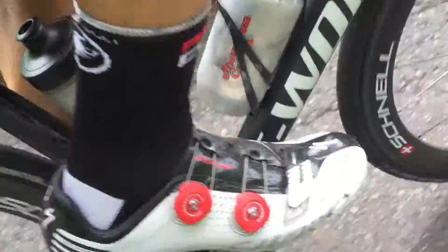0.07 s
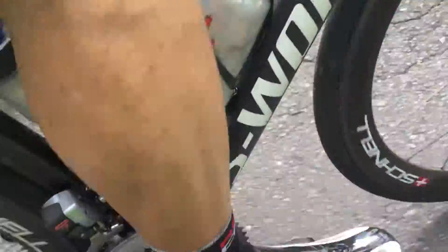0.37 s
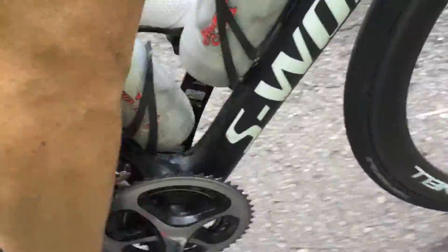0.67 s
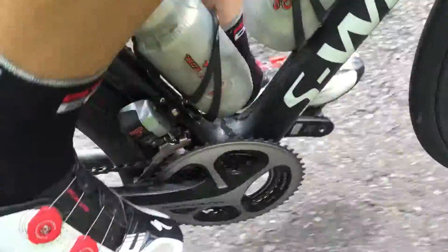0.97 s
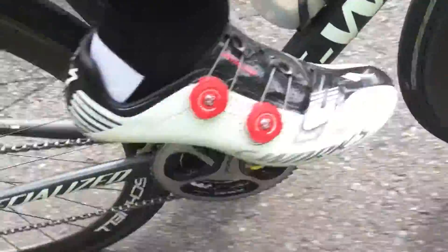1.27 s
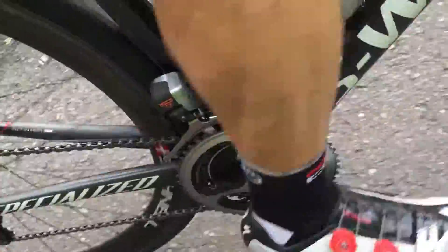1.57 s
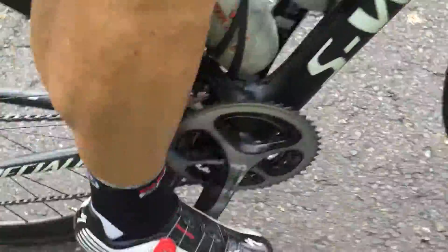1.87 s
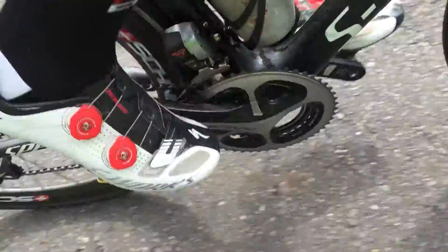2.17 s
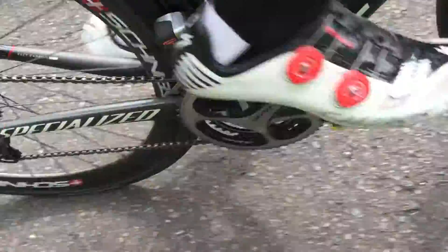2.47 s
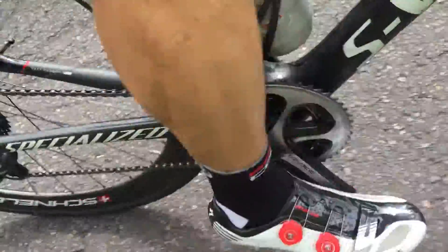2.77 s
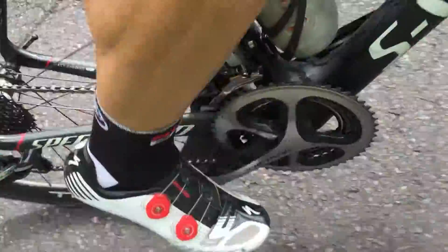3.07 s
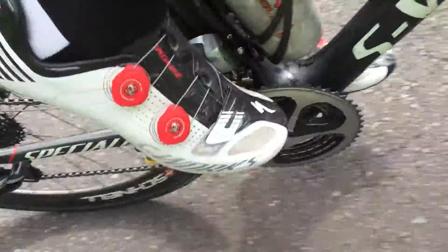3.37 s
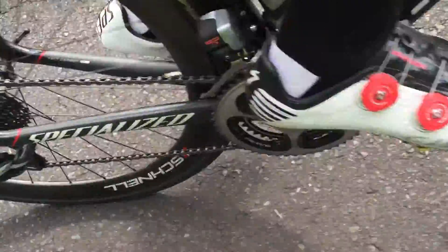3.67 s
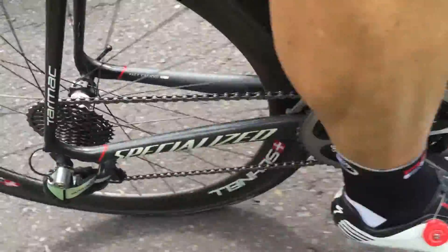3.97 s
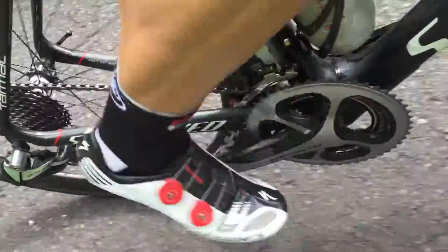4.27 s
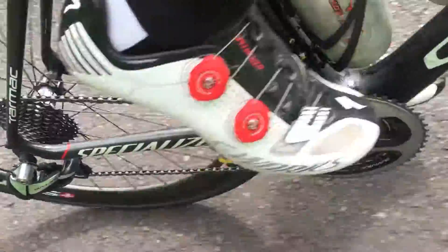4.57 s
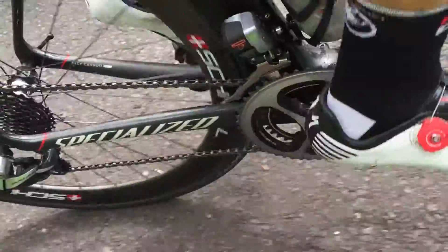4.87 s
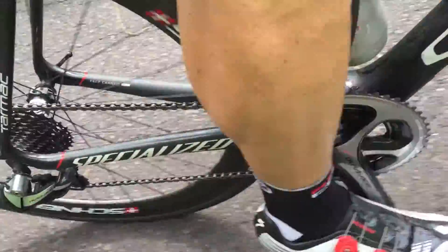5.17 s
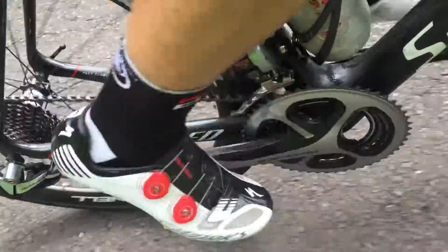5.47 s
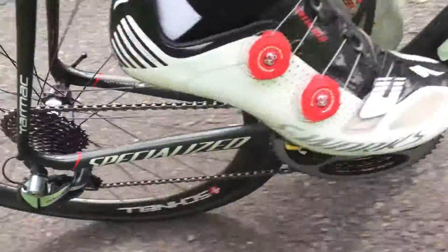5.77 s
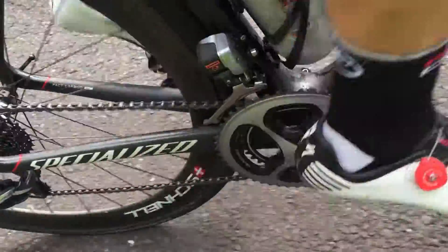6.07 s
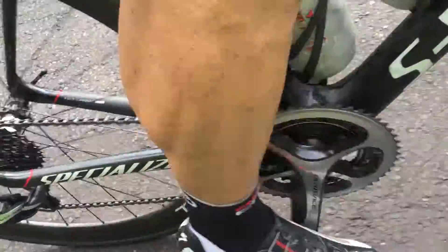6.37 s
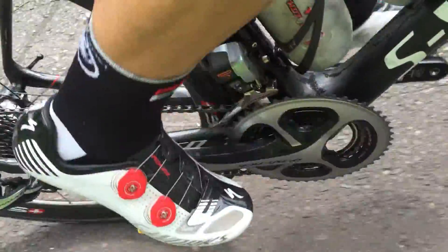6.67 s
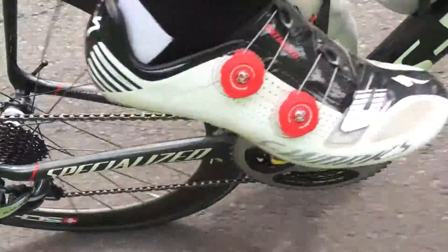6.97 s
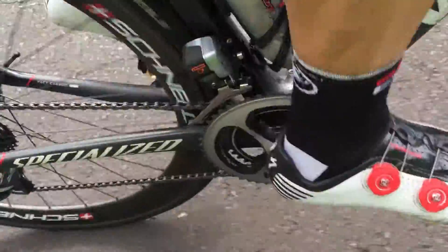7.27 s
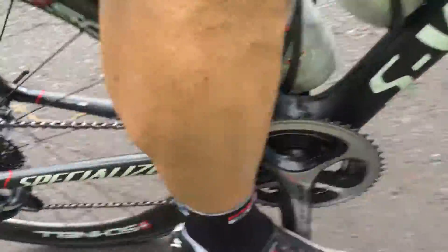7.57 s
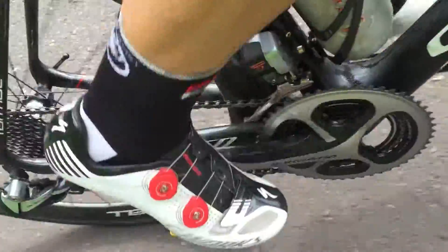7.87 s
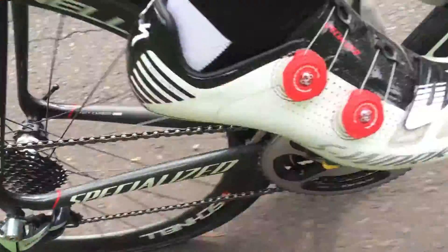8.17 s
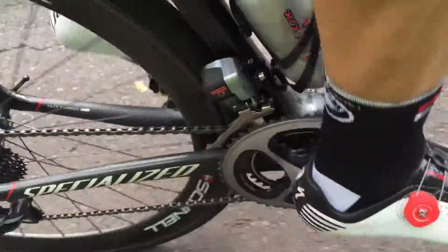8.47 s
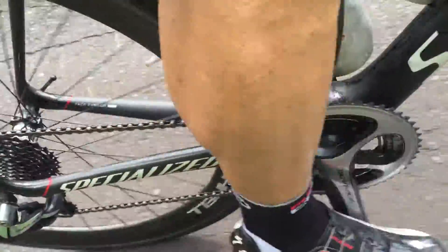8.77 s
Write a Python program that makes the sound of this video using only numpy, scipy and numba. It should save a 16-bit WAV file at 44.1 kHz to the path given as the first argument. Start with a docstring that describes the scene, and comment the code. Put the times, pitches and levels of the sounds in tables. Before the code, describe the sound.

A pedalled bicycle cracks and clunks sharply at uneven intervals, with faint chain ticks and a high insect hiss behind.

```python
"""On an asphalt road with cicadas in the trees, close beside the crank of a pedalled road bicycle.
The freehub slips under load: a heavy clunk, then a bright crack as the pawls catch again; frame and
spokes ring on. Underneath, the chain rustles and ticks, tyres roll and wind buffets the microphone.
A faint whistle sounds near the end. A limiter ducks everything after each loud blow."""
import sys
import numpy as np
from scipy import signal
from scipy.fft import rfft, irfft, next_fast_len
from scipy.io import wavfile
from numba import njit

SR = 44100
rng = np.random.default_rng(int(sys.argv[2]) if len(sys.argv) > 2 else 0)


def write(x):
    x = np.atleast_2d(x).T
    wavfile.write(sys.argv[1], SR, np.round(np.clip(x, -1, 1) * 32767).astype(np.int16))


N = 393813
TIME = np.arange(N) / SR


def undb(db):
    """Decibels to gain."""
    return 10 ** (np.asarray(db) / 20)


def unit(x):
    """Scale to rms 1."""
    return x / np.sqrt(np.mean(x ** 2))


def curve(rows):
    """Rows of (s, value) joined by straight lines."""
    return np.interp(TIME, *np.transpose(rows))


def at(hz, rows, column=1):
    """Read a table column on a log-frequency axis."""
    rows = np.array(rows)
    return np.interp(np.log(hz + 1), np.log(rows[:, 0]), rows[:, column])


def colour(x, spectrum):
    """Filter x by rows of (Hz, dB), then scale to rms 1."""
    size = next_fast_len(N)
    gain = undb(at(np.fft.rfftfreq(size, 1 / SR), spectrum))
    return unit(irfft(rfft(x, size) * gain, size)[:N])


def wander(rate_hz):
    """Random drift of rms 1, with rate_hz new values a second."""
    return unit(np.interp(TIME * rate_hz, np.arange(4096), rng.standard_normal(4096)))


def add(track, start_s, sound):
    """Mix a sound into the track."""
    i = int(start_s * SR)
    track[i:i + len(sound)] += sound[:max(len(track) - i, 0)]


def ring(modes, spread_hz, scatter_db=4, count=3):
    """Distinct struck modes, each split into a beating cluster."""
    out = np.zeros(2 * SR)
    for hz, db, t60_s in modes:
        t = np.arange(int(min(t60_s, 1) * SR), dtype=np.float32) / SR
        detune, force = rng.uniform(-1.017, 1, (2, count, 1)).astype(np.float32)
        phase = 2 * np.pi * ((hz + spread_hz * detune) * t + rng.random())
        cluster = np.sum(undb(scatter_db * force) * np.sin(phase), axis=0)
        add(out, 0, undb(db) * cluster * np.exp(-np.log(1000) * t / t60_s))
    return out


def structure_gain(hz, lift=0.56):
    """Response of the bicycle: peaks at its modes, valleys between."""
    modes_hz = np.array([mode[0] for mode in WHEEL_MODES + TUBE_MODES + STEEL_MODES])[:, None]
    widths_hz = 12 + 0.0026 * modes_hz
    peaks = np.max(1 / (1 + ((hz - modes_hz) / widths_hz) ** 2), axis=0)
    return (1 + lift * peaks) / (1 + lift / 2)


def dense_ring(body, stretch=1, focus_hz=0, focus_db=8, focus_octaves=0.52, size=8192):
    """Countless close modes struck at once, lifted near the focus; each band dies at its own rate."""
    hz, t = np.fft.rfftfreq(size, 1 / SR), np.arange(size) / SR
    octaves = np.log2((hz + 1) / (focus_hz + 1))
    emphasis_db = focus_db * np.exp(-(octaves / focus_octaves) ** 2 / 2)
    # Each contact point excites some groups of modes and misses others.
    emphasis_db += np.interp(np.sqrt(hz), np.arange(0, 150, 2.5), rng.uniform(-4.5, 3, 60))
    gain = unit(undb(at(hz, body))) * undb(emphasis_db) * structure_gain(hz)
    spectrum = rfft(rng.standard_normal(size)) * gain
    centres_hz = np.geomspace(100, 16000, 20)
    bands = np.array([np.interp(hz, centres_hz, row) for row in np.eye(len(centres_hz))])
    t60_s = at(centres_hz, body, column=2)[:, None] * stretch
    return np.sum(irfft(spectrum * bands) * np.exp(-np.log(1000) * t / t60_s), axis=0)


def pedal_push(stroke_s=0.576, first_peak_s=0.42):
    """One leg pushes every half turn of the crank: 1 in mid-stroke, -1 at the dead centres."""
    return np.cos(2 * np.pi * (TIME - first_peak_s) / stroke_s)


# Whistle glide. Each row: time in seconds, pitch in Hz.
WHISTLE_HZ = [(8.75, 881.5), (8.8, 937), (8.85, 828)]
# Whistle envelope. Each row: time in seconds, level in dB.
WHISTLE_DB = [(8.73, -101), (8.76, -57), (8.8, -45), (8.83, -57), (8.86, -51), (8.89, -92)]

def whistle():
    """One short, thin tone that rises and falls."""
    phase = 2 * np.pi * np.cumsum(curve(WHISTLE_HZ)) / SR
    return np.sqrt(2) * undb(curve(WHISTLE_DB)) * np.sin(phase)


# Cicada hiss. Each row: frequency in Hz, relative density in dB.
CICADA_SPECTRUM = [(2800, -70.5), (3650, -13), (4150, -5.5), (4600, 2.5), (5300, 3.5), (6000, -1),
                   (6700, -8), (7600, -20), (10000, -28), (15500, -35.5)]
# Chorus envelope. Each row: time in seconds, level in dB.
CHORUS_DB = [(0, -36), (3.3, -36.5), (5.1, -37.5), (6.9, -38), (7.7, -40.5), (8.9, -39.3)]

def cicadas(tymbal_hz=46.7, depth=0.24, overtone=0.37):
    """The insects merge into one band of hiss, pulsed in a fast, even buzz by the nearest one's tymbals."""
    phase = 2 * np.pi * np.cumsum(tymbal_hz * (1 + 0.015 * wander(5))) / SR
    buzz = 1 + depth * (np.cos(phase) + overtone * np.cos(2 * phase))
    return colour(rng.standard_normal(N), CICADA_SPECTRUM) * buzz * undb(curve(CHORUS_DB))


# Wind rumble and small eddies. Each row: frequency in Hz, relative density in dB.
RUMBLE_SPECTRUM = [(15, -58), (25, -31), (40, -22), (60, 4), (80, 0.5), (130, -5), (200, -18.5), (350, -31),
                   (800, -64), (2000, -69)]
EDDY_SPECTRUM = [(60, 1), (130, -6), (220, -3), (400, -16.5), (900, -33), (3000, -56)]
# Air stream strength. Each row: time in seconds, relative level in dB.
AIR_DB = [(0.25, -57), (0.42, -50.5), (0.76, -65), (2.18, -57.5), (2.46, -52.5), (3.55, -58.5),
          (5.14, -45.5), (5.89, -47.5), (6.9, -46.5), (7.31, -55.5), (7.69, -43), (8.9, -44)]

def wind(gain_db=3, gust_db=1.2, buffet_db=4, eddy_db=-46, strong_db=-37):
    """Air buffets the microphone in random gusts; strong ones shed smaller, higher eddies."""
    air_db = curve(AIR_DB) + gain_db + gust_db * wander(7.3) + buffet_db * wander(32)
    rumble = colour(rng.standard_normal(N), RUMBLE_SPECTRUM) * undb(air_db)
    excess_db = np.minimum(air_db - strong_db, 4)
    eddies = colour(rng.standard_normal(N), EDDY_SPECTRUM) * undb(eddy_db + 2 * excess_db)
    return rumble + eddies


# Rolling noise. Each row: frequency in Hz, relative density in dB.
TYRE_SPECTRUM = [(60, -12), (110, 4.5), (165, 12.5), (230, -2), (340, 0.5), (400, 4), (450, -2), (600, 0.5),
                 (730, -7.5), (1000, 4), (1200, -1), (1600, -2), (3500, -5), (8000, -14), (15500, -46.5)]

def tyres(base_db=-52, stroke_db=1, rise_db_per_s=0.14, uneven_db=3.5):
    """Tyres roll on coarse asphalt, a little louder with each pedal stroke and as the ride goes on."""
    level_db = base_db + stroke_db * pedal_push() + rise_db_per_s * TIME + uneven_db * wander(12)
    return colour(rng.standard_normal(N), TYRE_SPECTRUM) * undb(level_db)


# Roller rustle. Each row: frequency in Hz, relative density in dB.
CHAIN_SPECTRUM = [(700, -38), (1800, -0.5), (2080, 11.5), (2350, 6.5), (2750, 9.5), (3400, 7.5), (6000, 0),
                  (10000, -11), (15500, -20)]
# Chain rubs. Each row: centre in seconds, boost in dB.
CHAIN_RUBS = [(.975, 9), (7.78, 7), (7.95, 5), (8.30, 12.5)]

def chain_rustle(base_db=-57, stroke_db=3.5, rise_db_per_s=0.59, uneven_db=2.8, rub_half_s=0.019):
    """Rollers seat on the teeth, swelling with each pedal stroke; now and then a link rubs."""
    rattle = rng.standard_normal(N) * undb(2.6 * wander(300))
    level_db = base_db + stroke_db * pedal_push() + rise_db_per_s * TIME + uneven_db * wander(24)
    rub_db = sum(db * np.exp(-((TIME - s) / rub_half_s) ** 2) for s, db in CHAIN_RUBS)
    return colour(rattle, CHAIN_SPECTRUM) * undb(level_db + rub_db)


# Tick of a link. Each row: frequency in Hz, relative density in dB, t60 in seconds.
LINK_BODY = [(500, -7, 0.037), (2500, 0, 0.048), (5500, 4, 0.037), (9000, -2, 0.037), (15000, -1, 0.013)]
# Timed ticks. Each row: start in seconds, relative level in dB.
LINK_TICKS = [(0.8823, -30.5), (1.367, -30.5), (2.3953, -30), (5.2702, -37), (5.947, -38), (6.2274, -28),
              (6.7695, -34), (8.3107, -33)]

def chain_ticks(gain_db=-1.5):
    """Single links tick at set times."""
    out = np.zeros(N)
    for start_s, db in LINK_TICKS:
        add(out, start_s, undb(db + gain_db) * dense_ring(LINK_BODY, size=4096))
    return out


def faint_ticks(rate_hz=4.5, gain_db=-37.5):
    """Links click softly at random times."""
    out = np.zeros(N)
    for start_s in rng.uniform(0, TIME[-1], int(rate_hz * N / SR)):
        add(out, start_s, undb(gain_db) * dense_ring(LINK_BODY, size=4096))
    return out


# Modes of frame, rim and spokes; of steel pawls and sprockets; of hollow carbon frame tubes.
# Each row: frequency in Hz, relative level in dB, t60 in seconds.
WHEEL_MODES = [(179, -5.5, 0.22), (340, -9.5, 1.47), (402, -11.5, 1.92), (466, 4.5, 0.23),
               (574, -13.5, 1.51), (679, 0, 0.52), (834, -10, 1.18), (887, -4.5, 0.88), (916, 6.5, 0.32),
               (1068, -10, 0.33), (1105, 8, 0.33), (1187, -4.5, 0.87), (1370, 4.5, 0.42), (1400, -4, 0.94),
               (1535, 3, 0.38), (1713, 4, 0.36), (1835, 0.5, 0.47), (1920, -1, 0.5), (2075, -6.5, 0.36),
               (2137, -1, 0.36), (2600, 8, 0.21)]
STEEL_MODES = [(2724, -22, 0.3), (3380, -20, 0.2), (3630, -33, 0.065), (4020, -31, 0.24), (4298, 11, 0.038),
               (5685, 1, 0.079), (6560, -7, 0.051), (8610, -6, 0.056), (9010, 2, 0.08), (10950, 7.5, 0.029),
               (11720, -0.5, 0.039), (12700, -3, 0.041), (14900, -16, .04)]
TUBE_MODES = [(326, -3.5, 0.061), (1127, 0, 0.09), (1364, -7.5, 0.11), (1535, -3, 0.14), (1676, 4, 0.16),
              (1810, -6, 0.14), (2029, 0.5, 0.093), (2067, 2, 0.054)]

def ringing_parts(heavy, bright, stretch, wheel_db=-37, steel_db=-33, tube_db=-25):
    """Wheel, steel and tubes ring after a blow; a short click passes little energy on to them."""
    drive = heavy * min(stretch, 1)
    wheel = drive * undb(wheel_db) * ring(WHEEL_MODES, spread_hz=15.15)
    steel = bright * stretch * undb(steel_db) * ring(STEEL_MODES, spread_hz=75)
    tubes = drive * undb(tube_db) * ring(TUBE_MODES, spread_hz=36.4, count=2)
    return wheel + steel + tubes


# Clunk of hub and frame; crack of the pawls; shiver of chain and sprockets.
# Each row: frequency in Hz, relative density in dB, t60 in seconds before stretch.
CLUNK_BODY = [(35, -15, 0.15), (90, -13, 0.28), (217, -2, 0.11), (299, 11, 0.057), (510, -1.5, 0.086),
              (780, -4.5, 0.25), (1120, -1.5, 0.18), (1560, -1.5, 0.16), (2280, -5, 0.13),
              (3420, 2.5, 0.088), (4000, 0, 0.08), (5650, -5, 0.052), (14900, -11, 0.076)]
CRACK_BODY = [(200, -7, 0.044), (1470, -2, 0.034), (4100, 4.5, 0.12), (6060, 7, 0.073), (8600, 8.5, 0.033),
              (10900, 8.5, 0.022), (14900, 7, 0.015), (17000, -18, 0.045)]
SHIVER_BODY = [(296, -2.5, 0.54), (950, -2.5, 0.74), (2050, -5.5, 0.62), (2250, -1, 0.33),
               (3290, -10, 0.45), (5940, -8, 0.31), (15000, -16.5, 0.26)]

def blow(clunk_db, crack_db, stretch, focus_hz, contact_s=0.00091):
    """One contact in the hub thumps the frame, cracks in the pawls and shakes chain and sprockets."""
    heavy, bright = undb(clunk_db), undb(crack_db)
    strike = ringing_parts(heavy, bright, stretch)
    add(strike, 0, heavy * undb(-7) * dense_ring(CLUNK_BODY, stretch, focus_hz))
    add(strike, 0, bright * undb(-8) * dense_ring(CRACK_BODY, stretch, focus_hz))
    shake = (heavy + bright * undb(-6)) * stretch
    add(strike, 0, shake * undb(-29) * dense_ring(SHIVER_BODY, size=16384))
    # The force builds while the parts press together.
    return strike * (1 - np.exp(-TIME[:len(strike)] / contact_s))


# Freehub slips, levels relative. Each row: start in seconds, clunk in dB, crack in dB, ring stretch
# factor, focus in Hz, catch delay in seconds, catch in dB, catch focus in Hz, rebound delay in seconds,
# rebound in dB.
HUB_SLIPS = [(0.5208, 3, -12, 0.8, 1580, 0.024, -1.5, 11500, 0.061, -15),
             (1.6177, 4.5, 1, 1.6, 2320, 0.034, 4, 12000, 0.039, 1),
             (2.5630, -0.5, -9.5, 0.58, 1620, 0.02, -4.5, 12000, 0.044, -7.5),
             (2.7763, 4, -8, 1.18, 2750, 0.027, -0.5, 6950, .0526, -9),
             (4.3348, -1.5, -2.5, 1.1, 1950, 0.023, 4.5, 9500, 0.048, -5.5),
             (4.8132, -7, -14, 1.35, 1840, .0158, -13, 1500, .043, -6.5),
             (5.4886, 3.5, -1.5, 1.72, 2260, 0.031, 5.5, 13400, .041, -0.5),
             (6.1228, 8, 5, 1.74, 1830, .0293, 5.5, 9000, .0363, 3),
             (6.3945, -1.5, -19, 0.87, 293, 0.017, -12, 8060, 0.058, -7.5),
             (7.4300, 3.5, -17, 0.75, 2120, 0.026, -2, 12000, .034, -11),
             (8.8868, -1.5, -21, 0.49, 1120, 0.013, -12.5, 1700, 0.019, -19)]
# Lone snaps of a pawl that holds. Each row: start in seconds, relative level in dB, ring stretch factor.
PAWL_SNAPS = [(3.5149, -3, 0.25), (4.92, -22, 0.64), (5.0273, -27, 1)]

def freehub():
    """Each slip is three blows: a clunk, the bright catch of the pawls, a duller settling of sprockets."""
    out = np.zeros(N)
    for start_s, *slip, catch_s, catch_db, catch_hz, rebound_s, rebound_db in HUB_SLIPS:
        add(out, start_s, blow(*slip))
        add(out, start_s + catch_s, blow(catch_db - 3.5, catch_db, stretch=0.75, focus_hz=catch_hz))
        add(out, start_s + rebound_s, blow(rebound_db, rebound_db - 1.5, stretch=0.81, focus_hz=2000))
    for start_s, db, stretch in PAWL_SNAPS:
        add(out, start_s, blow(db, db, stretch, focus_hz=4860))
    return out


def scene():
    """Bicycle, insects and air at one microphone."""
    drivetrain = freehub() + chain_rustle() + chain_ticks()
    return (drivetrain + cicadas() + tyres() + wind() + whistle() + faint_ticks())[None]


@njit
def follow(x, attack, release):
    """Envelope that jumps up with a peak and sinks slowly."""
    out, level = np.empty(len(x)), 0.
    for i in range(len(x)):
        level += (x[i] - level) * (attack if x[i] > level else release)
        out[i] = level
    return out


def record(dry, start_s=0.082, threshold_db=-5, ratio=5, attack_s=0.0003, release_s=0.38, top_hz=15300):
    """Brief silence at start-up, then limiter, soft clipper and low-pass."""
    x = dry[0] * (TIME > start_s)
    envelope = follow(np.abs(x), 1 / (attack_s * SR), 1 / (release_s * SR))
    limited = x / np.maximum(1, envelope / undb(threshold_db)) ** (1 - 1 / ratio)
    rounded = limited / (1 + (limited / 0.72) ** 6) ** (1 / 6)
    lowpass = signal.ellip(8, 0.1, 50, top_hz, fs=SR, output="sos")
    return signal.sosfiltfilt(lowpass, rounded)[None]


dry = scene()
out = record(dry)
write(out)
```